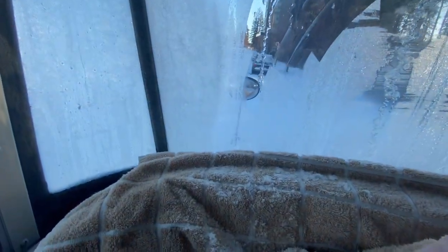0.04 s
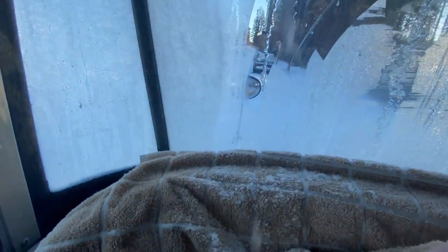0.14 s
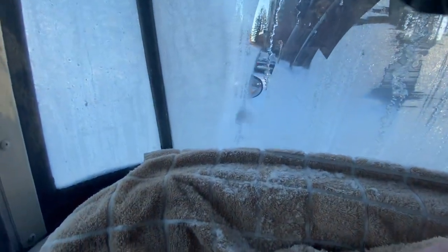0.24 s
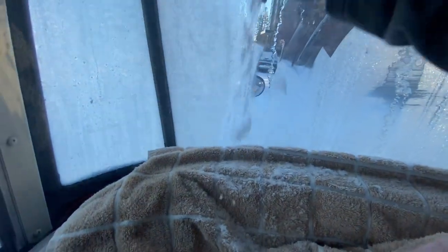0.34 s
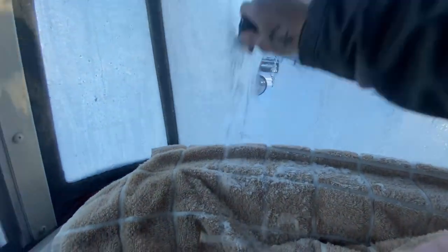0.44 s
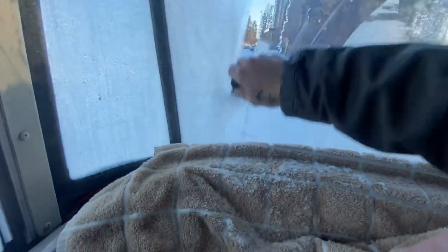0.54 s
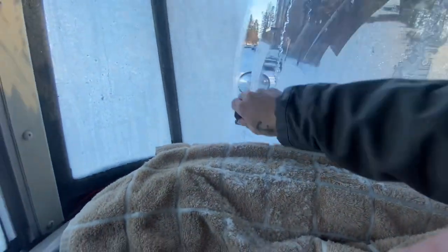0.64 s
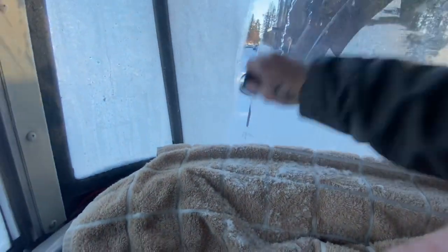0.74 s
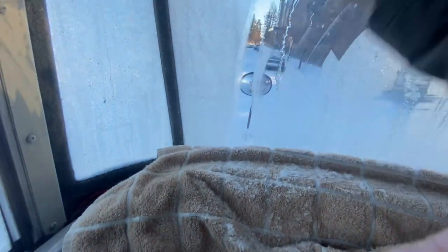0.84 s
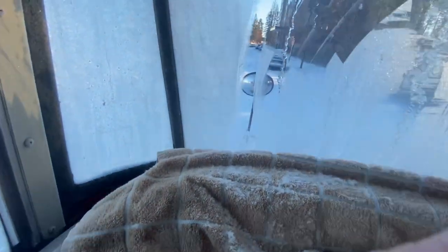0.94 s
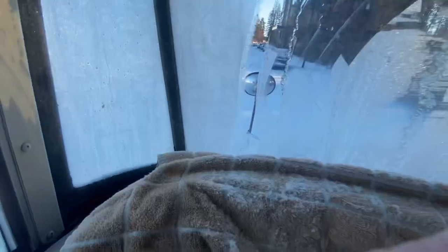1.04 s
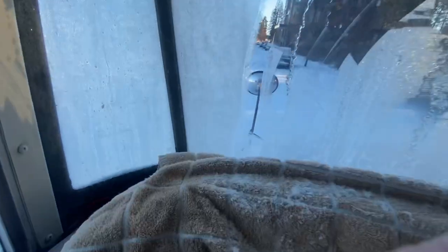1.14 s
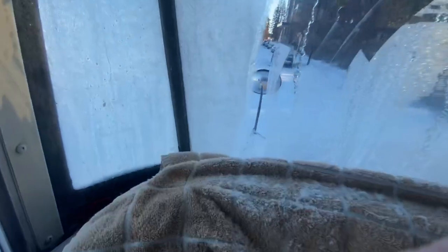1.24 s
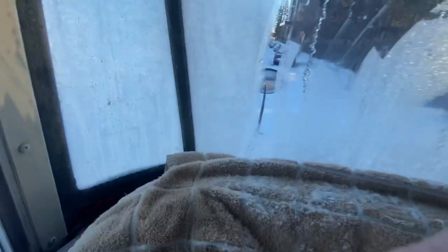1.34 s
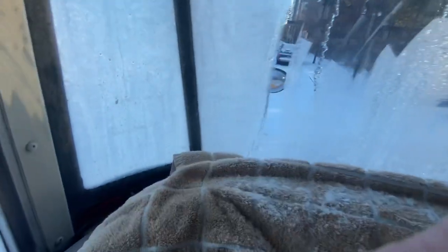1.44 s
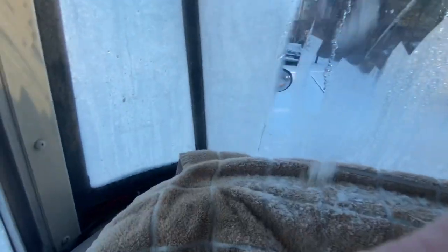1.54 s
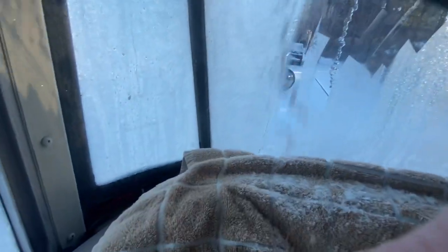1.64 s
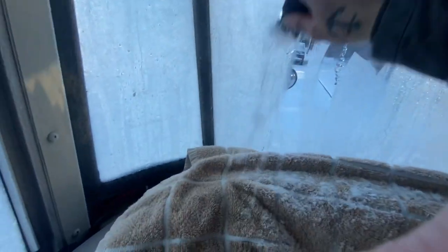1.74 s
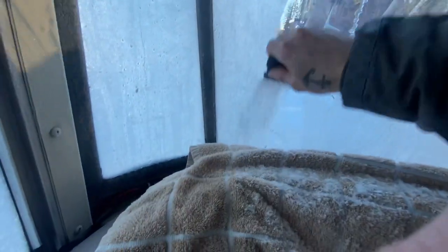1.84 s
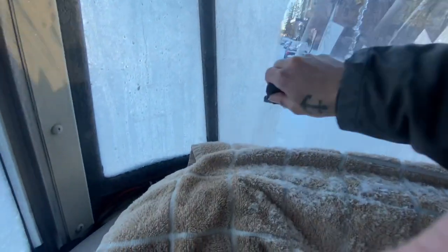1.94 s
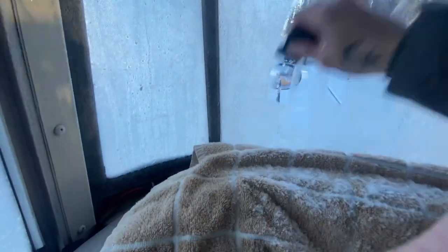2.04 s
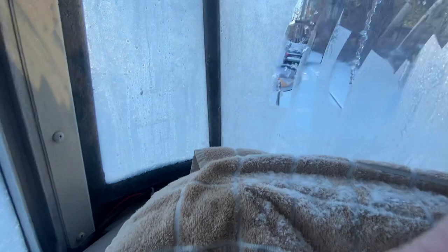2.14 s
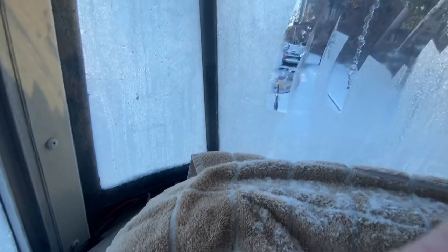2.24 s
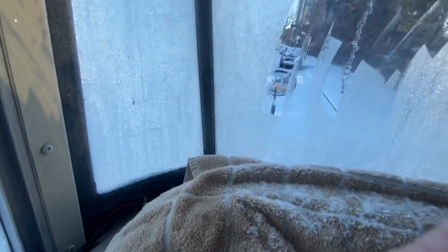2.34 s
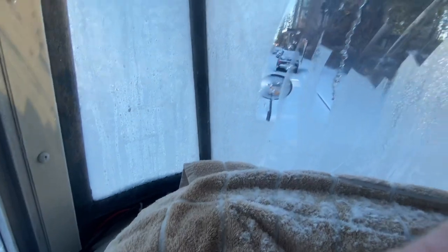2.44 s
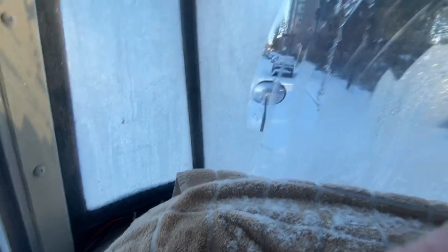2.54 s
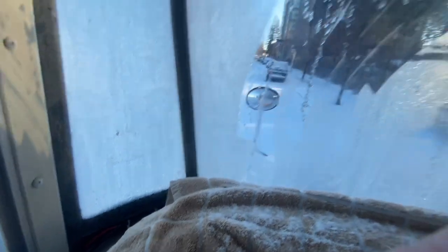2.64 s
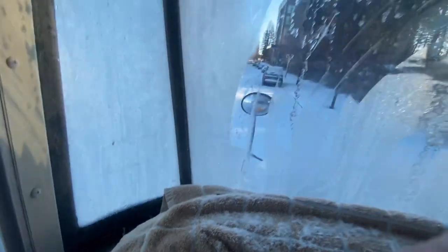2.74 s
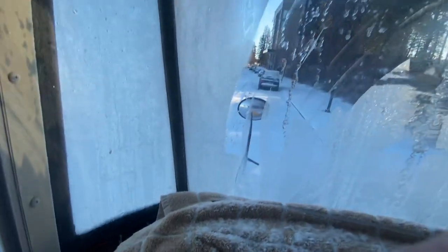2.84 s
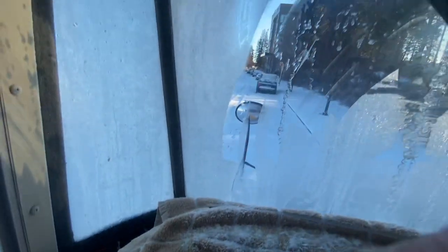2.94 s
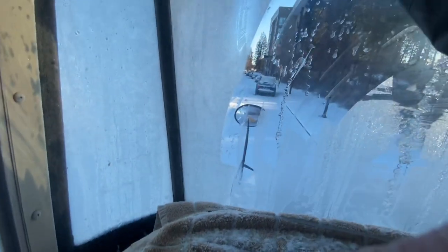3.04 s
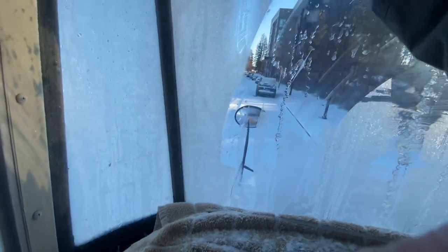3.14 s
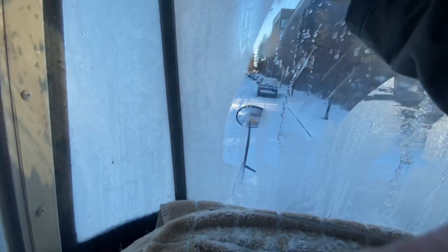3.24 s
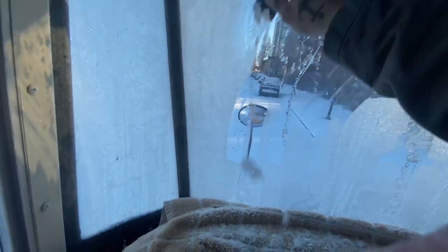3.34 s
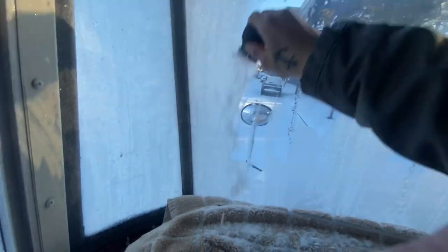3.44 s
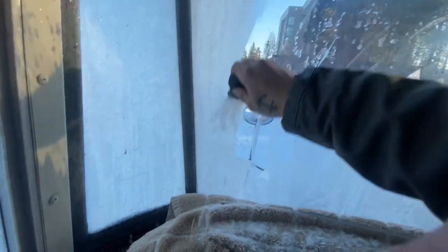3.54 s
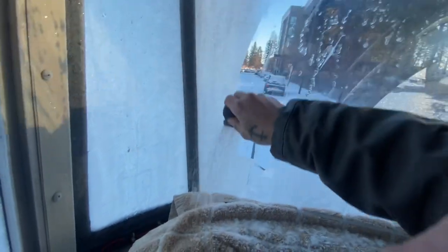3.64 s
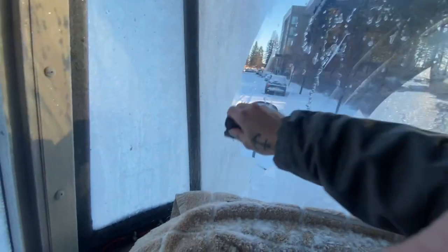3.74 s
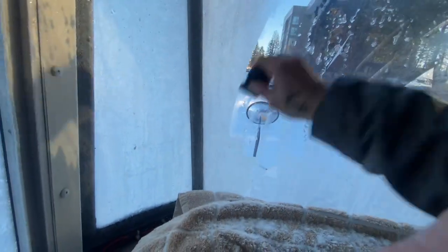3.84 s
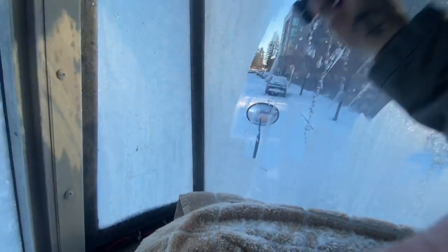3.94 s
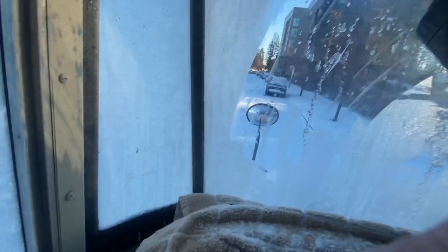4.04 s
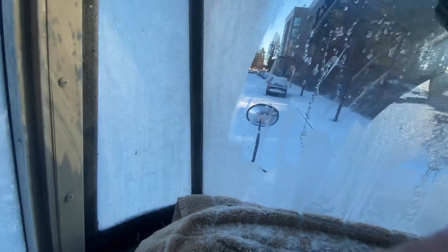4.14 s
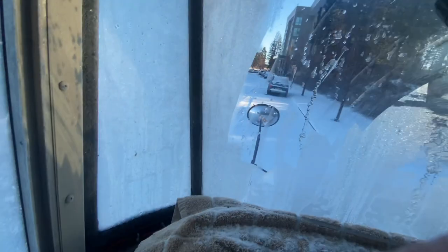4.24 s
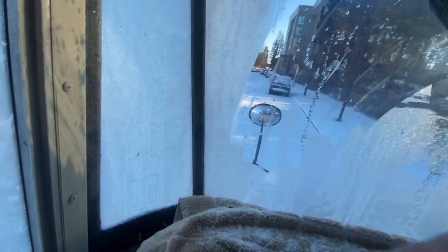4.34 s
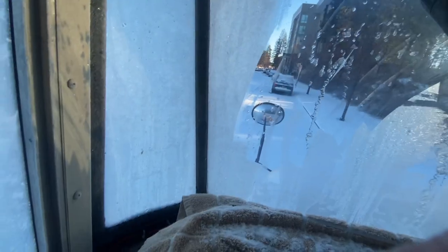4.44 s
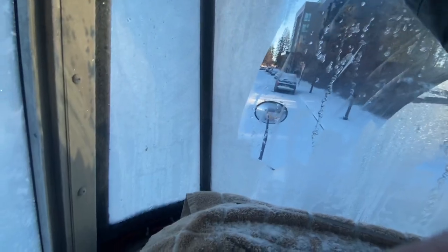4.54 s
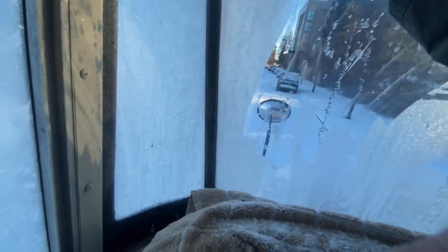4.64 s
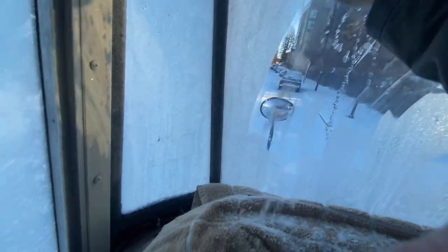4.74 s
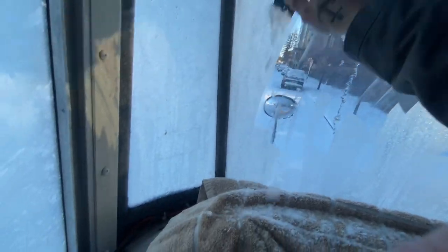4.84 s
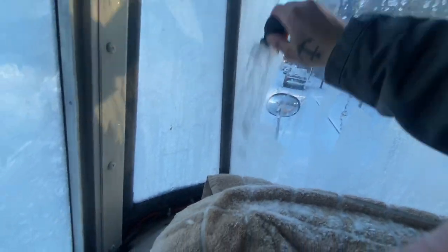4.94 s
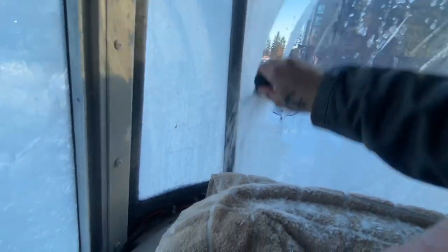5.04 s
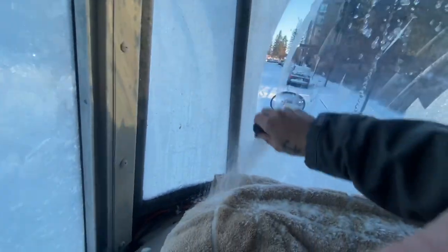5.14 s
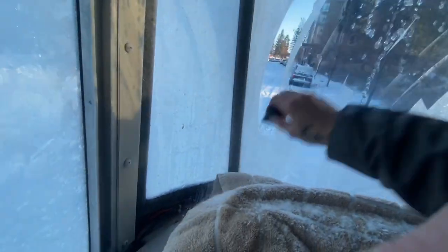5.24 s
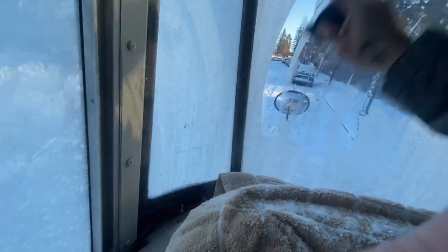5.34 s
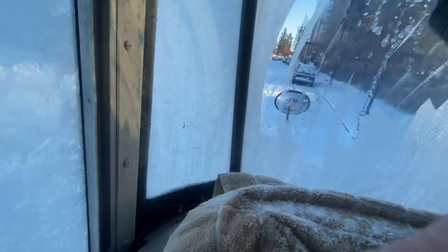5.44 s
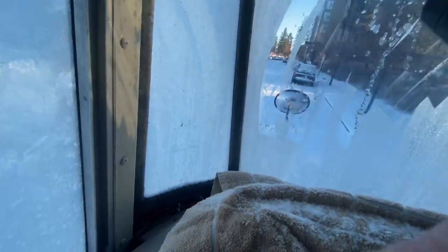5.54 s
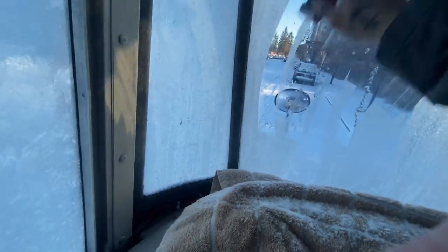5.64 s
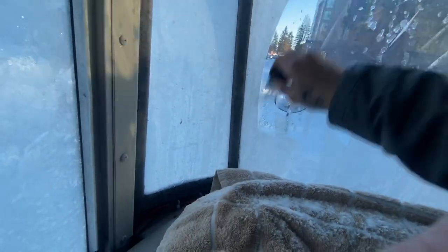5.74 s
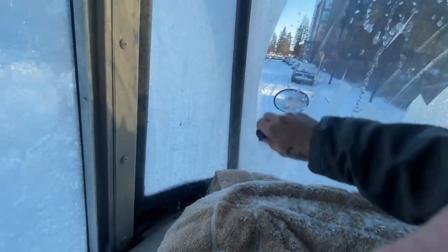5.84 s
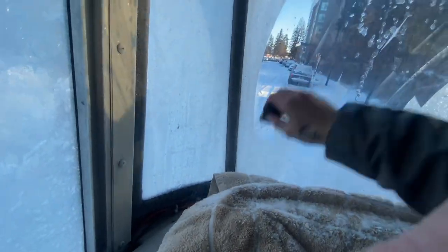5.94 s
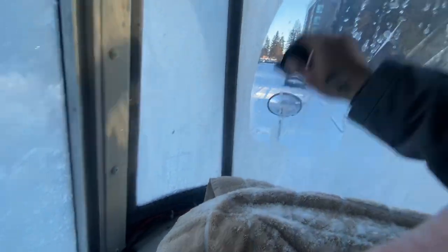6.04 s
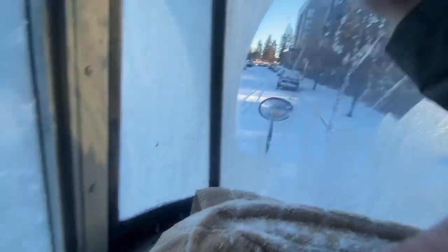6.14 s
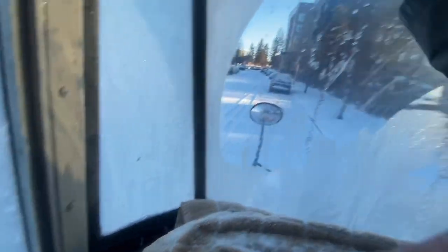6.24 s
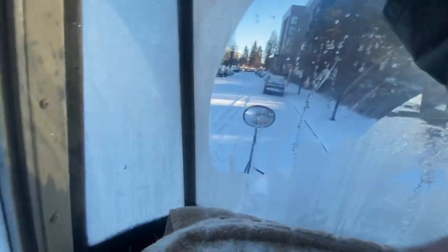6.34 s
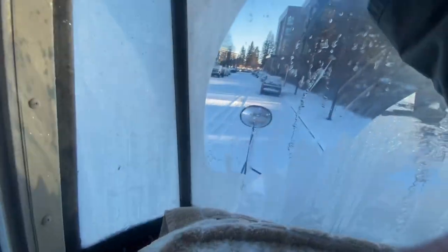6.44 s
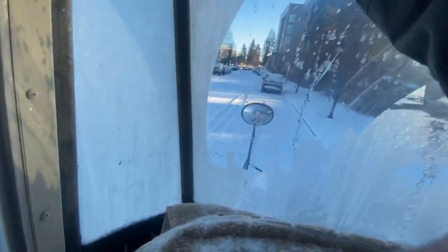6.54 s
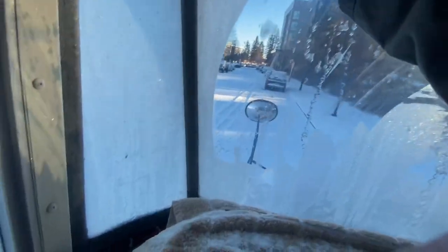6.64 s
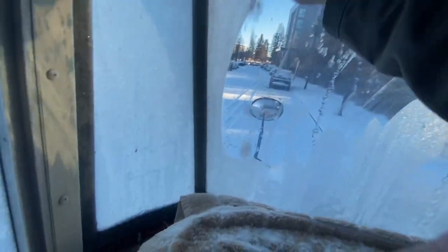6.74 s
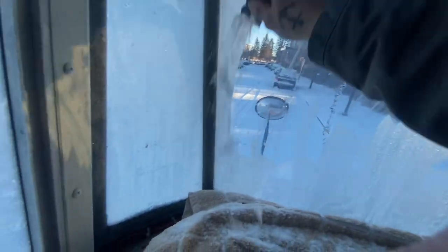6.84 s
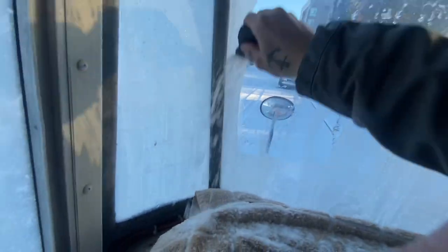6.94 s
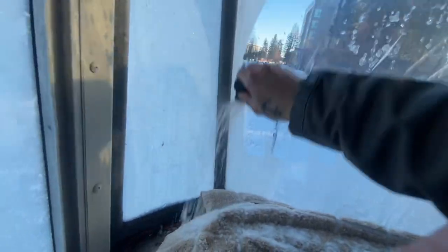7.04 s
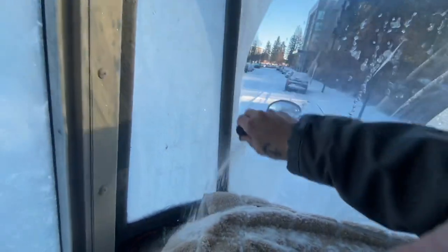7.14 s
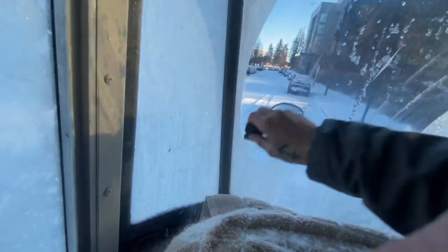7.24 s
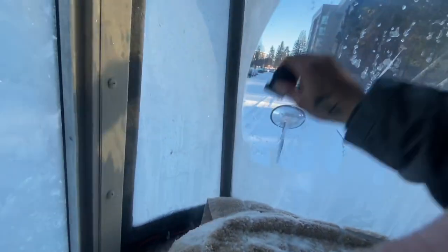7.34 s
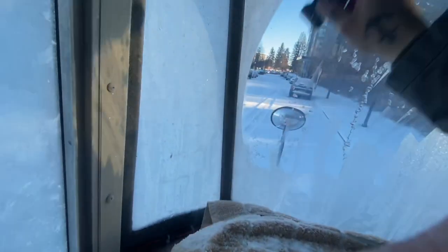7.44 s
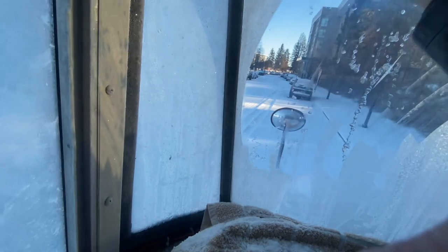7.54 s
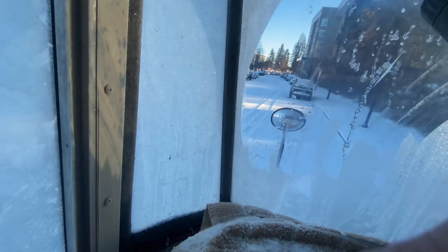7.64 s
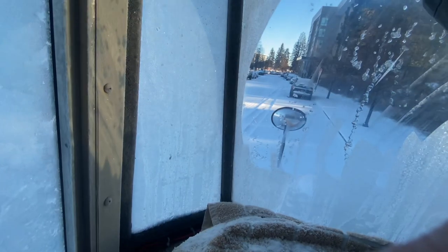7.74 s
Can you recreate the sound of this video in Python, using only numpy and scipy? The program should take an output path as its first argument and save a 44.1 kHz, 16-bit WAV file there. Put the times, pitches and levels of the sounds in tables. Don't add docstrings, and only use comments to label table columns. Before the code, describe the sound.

Very close stereo sound of a hard plastic scraper shaving frost from a window in a small, damped vehicle cabin. Five two-part strokes, a heavier gritty push followed by a lighter, hissier drag, come with pauses of about a second. Between them the edge ticks on glass, ice crumbs patter and shavings rustle softly. Low pane and door thumps sit beneath the pressed strokes, over faint street rumble.

```python
import sys
import numpy as np
from scipy import signal
from scipy.fft import rfft, irfft, next_fast_len
from scipy.io import wavfile
from scipy.ndimage import uniform_filter1d, map_coordinates

SR = 44100
rng = np.random.default_rng(int(sys.argv[2]) if len(sys.argv) > 2 else 0)


def gain_from_decibels(decibels):
    exponent = np.asarray(decibels, float) / 20
    return 10 ** exponent


def generate_wav(sig):
    pcm = np.round(np.clip(np.atleast_2d(sig).T, -1, 1) * 32767).astype(np.int16)
    wavfile.write(sys.argv[1], SR, pcm)


N = 343098

# t/s, blade speed/dB, pressure/dB
PUSHES = [
    [(0.0, -36.5, -7), (0.05, -47.5, -11), (0.074, -37, -25), (0.082, -39.5, -15), (0.208, -32.5, -18),
     (0.28, -40.5, -14), (0.3, -35.5, -22)],
    [(1.19, -40.5, -9.5), (1.202, -41.5, 5.5), (1.288, -43, -9), (1.332, -32.5, -20.5), (1.392, -36.5, -11),
     (1.432, -29, -11), (1.598, -41, -16), (1.655, -41, -21)],
    [(2.94, -58.5, 4.5), (2.978, -44.5, -1.5), (3.002, -43, 1.5), (3.06, -46.5, -2), (3.086, -37.5, -3),
     (3.258, -34.5, -7), (3.338, -43, -16.5), (3.39, -49, -14)],
    [(4.36, -54, 4.5), (4.392, -49, 6.5), (4.428, -41, 1), (4.504, -34.5, 3.5), (4.52, -39, -8.5),
     (4.534, -40, -2.5), (4.6, -38, -10.5), (4.685, -44.5, -23.5)],
    [(6.4, -46.5, 0), (6.42, -42.5, -1.5), (6.486, -42.5, -2.5), (6.492, -41, -11), (6.574, -39.5, -15),
     (6.612, -36.5, -6), (6.754, -37, -19.5), (6.8, -36.5, -11.5)],
]
# t/s, blade speed/dB, pressure/dB
PULLS = [
    [(0.31, -36.5, -16), (0.392, -39.5, -21), (0.474, -36, -20.5), (0.57, -37.5, -19), (0.642, -45, -15),
     (0.648, -48, -22), (0.658, -45, -6), (0.67, -53, -14)],
    [(1.67, -41, -25), (1.706, -33.5, -11), (1.734, -30, -11.5), (1.826, -34, -17), (1.86, -31, -18.5),
     (1.944, -35, -15), (1.952, -37.5, -20), (1.96, -63, -20)],
    [(3.405, -45, -18), (3.411, -47, -7), (3.445, -36.5, -24.5), (3.537, -36, -11), (3.561, -34, -21),
     (3.577, -35, -11), (3.719, -37.5, -20), (3.74, -49, -18)],
    [(4.7, -42.5, -23), (4.78, -32.5, -22.5), (4.88, -32.5, -13.5), (4.9, -27.5, -18), (4.956, -37, -15),
     (5.004, -31.5, -19.5), (5.174, -37, -15.5), (5.205, -66, -5)],
    [(6.81, -34.5, -22), (6.832, -37, -14), (6.936, -38, -18.5), (7.06, -33.5, -13.5), (7.068, -29, -16.5),
     (7.092, -35, -16.5), (7.12, -35, -17), (7.135, -66, -17)],
]
# t/s, blade speed/dB, pressure/dB
FLICKS = [
    [(1.095, -43, 0), (1.105, -43, 5.5), (1.135, -55, -3), (1.16, -59, 1)],
    [(5.61, -54.5, -3.5), (5.664, -42, -17.5), (5.702, -44.5, -10), (5.72, -46, -12.5), (5.78, -56, -4.5)],
    [(5.815, -45, -17), (5.839, -46.5, -19), (5.853, -31, -11.5), (5.91, -67, 2)],
]
# t/s, fade for 20 dB/s, level/dB, weight/dB
RUSTLES = [(.69, 0.53, -66.5, -12), (.96, 0.9, -67, 4.5), (1.975, 0.12, -64.5, -5), (2.095, 0.06, -75, 20),
           (2.276, 1.5, -82.5, 16), (2.34, 0.37, -68, -3), (2.425, 0.29, -66, 13), (2.6, 3, -82.5, -3),
           (2.885, 0.35, -61.5, 6), (3.75, 0.23, -67, -11), (3.9, 4, -82.5, 2.5), (4.27, 1.3, -62.5, 2.5),
           (5.168, 0.0078, -32, -17), (5.21, 0.8, -65, 2), (5.49, 0.39, -57.5, 2), (5.92, 0.9, -73.5, 2),
           (6.2, 0.5, -73, 2), (6.314, 0.77, -64.5, 3.5), (7.145, 0.38, -65.5, -1), (7.37, 0.22, -67.5, -2),
           (7.575, .15, -75, 1), (7.62, 0.07, -74.5, 5)]
# t/s, length/s, extra rasp/dB
SNAGS = [(0.658, .02, 3), (1.088, 0.063, 5), (1.438, 0.044, 1.5), (1.74, 0.051, 5), (3.224, 0.03, 1.5),
         (3.565, 0.017, 1), (3.73, 0.022, 8.5), (4.601, .04, 3.5), (4.79, 0.046, 4), (4.891, 0.021, 5),
         (5.16, 0.017, 8.5), (5.848, 0.012, 9), (7.06, 0.036, 6), (7.12, 0.016, 3.5)]
# t/s, length/s, f/Hz, boost/dB
VOICES = [(.15, .15, 5400, 2.5), (.5, .15, 8700, 2.5), (0.449, .15, 1100, -5.5), (.99, .04, 2100, 13),
          (.935, .015, 2250, 12), (1.43, .08, 11000, 5.5), (1.449, .15, 650, -5), (1.47, .12, 1500, 8),
          (1.1, .1, 390, -6), (3.03, .07, 3400, -7), (5.68, .04, 3200, -8), (1.77, .06, 2300, 6),
          (1.78, .06, 750, 4), (1.8, .12, 8600, 3), (3.18, .13, 5400, 6), (3.15, .15, 3900, -4),
          (3.17, .12, 6600, -3), (3.05, .1, 1250, 3), (3.1, .15, 750, -4), (4.43, .08, 800, -5),
          (4.43, .06, 1800, -4), (3.55, .12, 750, 5), (3.551, .1, 5400, 2.5), (3.6, .15, 1300, -4),
          (4.48, .06, 1250, 3.5), (4.901, .2, 560, -8), (4.949, .2, 2900, 2.5), (4.95, .15, 11000, 3),
          (5.52, .04, 1800, 6.5), (5.699, .06, 8200, 5), (5.7, .06, 1000, 6.5), (5.855, .012, 3600, 6),
          (5.86, .02, 600, 6), (5.16, .03, 3800, 6), (7.03, .1, 850, 6), (.3, .12, 6400, -3),
          (6.55, .15, 5400, 3.5), (6.5, .1, 1400, 4), (6.55, .15, 750, -5), (7.05, .07, 1700, 4),
          (6.95, .12, 9800, -3.5), (7.409, .025, 2300, 21), (7.48, .035, 2250, 20), (7.375, .015, 2700, 12),
          (7.37, .06, 4300, 7)]
# t/s, level/dB
LEAN = [(0.0, -50), (0.56, -44.5), (0.6, -43), (0.93, -61), (1.25, -41.5), (1.71, -59.5), (1.82, -47.5),
        (2.66, -65), (3.23, -48), (3.51, -58), (3.66, -43.5), (4.05, -68.5), (4.1, -56), (4.29, -67),
        (4.42, -41), (4.96, -59.5), (5.85, -56), (7.55, -57)]
# f/Hz, density/dB per Hz
FIZZ = [(3000, -32.5), (4800, -13), (5800, -2), (6900, -6), (8200, -2), (9400, -2.5), (11400, -8),
        (13000, -12), (16000, -24.5)]
# f/Hz, density/dB per Hz
RASP = [(800, -29.5), (1300, -3.5), (1800, 4.5), (2500, 2), (3500, 1), (4500, -2), (6500, -17.5)]
# f/Hz, density/dB per Hz
SCRUB = [(250, -38.5), (450, -4.5), (720, 1.5), (1000, -2), (1300, -1), (2200, -31)]
# f/Hz, density/dB per Hz
CRUNCH = [(400, -27), (1500, 4.5), (4000, 1.5), (8000, -0.5), (12000, -9), (16000, -2.5)]
# f/Hz, width/Hz, level/dB
PANE = [(154.2, 28, -2), (179.6, 27.4, -0.5), (219.2, 16, -1.5), (244.8, 62, -6.5), (299.5, 21, -2.5),
        (326.3, 30, -1.5), (380, 130, -12.5)]
# f/Hz, width/Hz, level/dB
DOOR = [(55, 17.3, -3.5), (69.9, 6.7, -9), (85.3, 16.2, -1.5), (120.7, 20, -11.5)]
# t/s, peak/dB, ring f/Hz, ring/dB, thud/dB
KNOCKS = [(0.698, -28.5, 1960, -1.5, -27), (1, -31.5, 1600, -4, -21), (1.0913, -28.5, 1410, -10, -17),
          (1.193, -34, 990, -3, -5.5), (1.9758, -23, 4050, -4, -34), (2.4193, -39.5, 377, -3, -13),
          (2.87, -29.5, 1230, -14, 1.5), (3.7443, -27.5, 4100, 7, -24), (4.2618, -30, 1740, -5, -26),
          (4.355, -33, 1170, -5, 10.5), (5.246, -32, 2380, -3, -19), (5.4519, -30.5, 2090, -1.5, -19),
          (5.4771, -10.5, 1776, 0.5, -10), (5.8141, -33, 1400, -10, -11), (6.304, -25, 1810, 1, -5),
          (6.4, -34, 1300, -6, 12), (7.1198, -25, 1670, -12, -33), (7.1583, -32.5, 3610, -2, -17),
          (1.222, -46, 266, 4, 12), (4.475, -38.5, 220, 8.5, 16), (6.6, -44, 319, 3, 5)]
# t/s, peak/dB, ring f/Hz, ring/dB
CRUMBS = [(0.926, -48, 2230, 9), (0.9707, -42, 2140, 9), (2.158, -46, 2060, 5), (2.272, -52, 1360, 7),
          (2.323, -53, 1410, -2), (3.923, -64, 1670, 1), (5.298, -45, 3340, -23), (5.4295, -47, 2000, -7),
          (5.6, -45, 1680, -4), (6.1768, -53, 2350, -18), (6.2074, -37, 2050, -5), (6.2675, -43, 4200, -1),
          (6.3794, -39, 1890, -12), (6.345, -44.5, 2600, -8), (5.197, -41, 2200, -9),
          (7.249, -52, 1730, -1), (7.3255, -56, 4400, 3), (7.3602, -50, 4300, 0), (7.3944, -49, 4000, 3),
          (7.423, -53, 5400, 0), (7.37, -64, 2750, 9), (7.395, -62, 2300, 12), (7.4069, -54, 2150, 11),
          (7.413, -62, 2500, 13), (7.424, -64, 2200, 12), (7.457, -64, 2350, 11), (7.466, -63, 2150, 12),
          (7.483, -65, 2250, 12), (7.493, -65, 2400, 12), (7.501, -68, 2150, 12), (7.5705, -52, 3100, -3),
          (7.622, -55, 6100, 0), (5.4725, -39, 2000, 0), (7.588, -62.5, 371, 15), (7.611, -49, 1920, -6),
          (5.311, -59, 377, 10), (5.521, -46.5, 3700, -10), (5.548, -37.5, 3500, -10)]
# f/Hz, left lead/rad
LEAD = [(0, 0), (340, -0.28), (520, -1.64), (1120, -6), (4390, -7.0), (6890, -0.5), (7920, -3), (8270, -4),
        (9130, -9), (10400, -11.5), (11900, -12), (12500, -15), (14000, -15), (14600, -21), (16400, -20.5)]
# f/Hz, rms/rad
WANDER = [(100, 0.39), (300, 0.59), (800, 1.82), (6000, 1.4), (8500, 0.4), (11000, .25)]
# f/Hz, left-right/dB
TILT = [(100, -0.5), (400, -3.5), (800, 5), (1500, 0), (5800, 5.5), (8300, -5), (12000, -1.5)]
# t/s, left-right/dB
HAND = [(0.0, -0.5), (1.62, 0.5), (1.9, -3.5), (1.97, 0.5), (2.23, 1), (2.27, 4.5), (2.34, -2.0),
        (3.14, 2.5), (3.16, 0.0), (4.33, -1.5), (4.4, 1.0), (5.11, -1.0), (5.2, 1.5), (5.59, 1.0),
        (5.68, -2.0), (6.46, 2.0), (6.87, 0), (7.78, 1.5)]
# f/Hz, t60/s
CABIN = [(100, 0.039), (1000, 0.15), (10000, 0.065)]
# f/Hz, level/dB
WET = [(100, -30.5), (500, -7), (3000, 1), (7000, -1.5), (11000, -2.5)]
# f/Hz, density/dB per Hz
QUIET = [(18, -33.5), (30, 2.5), (92, -1), (247, -33.5), (288, -31.5), (629, -26.5), (735, -45.5),
         (11600, -48), (12500, -23.5), (15000, -39)]
# f/Hz, rms/dB
WHINE = [(12845, -86)]

LAND_DB_PER_S, LIFT_DB_PER_S = 2502, 1501
RUSTLE_RISE_S = 0.033
VOICE_OCTAVES = 0.16
MID_SPEED_DB, MID_PRESS_DB = -36.5, -10.5
RASP_DB, RASP_PER_PRESS = -9, 0.33
BOOM_PER_SPEED, BOOM_PER_PRESS = 0.21, 0.3
RING_CYCLES, OVERTONE = 41, 2.3
CRUMB_THUD_DB, CRUNCH_T60_S, SHORTER_PER_DB = -18, 0.042, 0.44


def unit(x):
    return x / np.sqrt(np.mean(x ** 2) + 1e-20)


def along(points, hz):
    f, v = np.transpose(points)
    return np.interp(np.log(hz + 1), np.log(f + 1), v)


def at_time(points):
    return np.interp(np.arange(N) / SR, *np.transpose(points))


def wobble(rate_hz):
    knots = rng.standard_normal(int(N * rate_hz / SR) + 4)
    return map_coordinates(knots, [np.arange(N) * rate_hz / SR], order=2, prefilter=False) * 1.15


def filtered(x, response):
    m = next_fast_len(x.shape[-1] + 8192)
    return irfft(rfft(x, m) * response(np.fft.rfftfreq(m, 1 / SR)), m)[..., :x.shape[-1]]


def coloured(x, colour):
    return unit(filtered(x, lambda hz: gain_from_decibels(along(colour, hz))))


def patches(shape, bins, frames):
    field = rng.standard_normal(shape)
    for _ in range(2):
        field = uniform_filter1d(field, int(bins), 0)
        field = uniform_filter1d(field, int(frames), 1)
    return unit(field)


def scraping():
    fizz_db, press_db = contact()
    rasp_db = fizz_db + RASP_DB + RASP_PER_PRESS * (press_db - MID_PRESS_DB)
    t = np.arange(N) / SR
    snag_db = sum(db * np.exp(-((t - s) / length) ** 2) for s, length, db in SNAGS)
    rasp_db = rasp_db + snag_db
    fizz_db = fizz_db + 0.2 * snag_db
    scrub_db = fizz_db + press_db
    drum_db = at_time(LEAN) + 5
    drum_db += BOOM_PER_SPEED * (np.maximum(fizz_db, -75) - MID_SPEED_DB)
    drum_db += BOOM_PER_PRESS * (np.minimum(press_db, 4) - MID_PRESS_DB)
    frost = breaking(grain_db=2.5, clump_db=1.2, patchy_db=1.1, streak_db=3.6)
    judder = wobble(45)
    fizz = gain_from_decibels(fizz_db + 0.65 + 0.24 * judder) * coloured(frost, FIZZ)
    rasp = gain_from_decibels(rasp_db + 0.55 + 0.52 * judder) * coloured(frost, RASP)
    scrub = gain_from_decibels(scrub_db - 0.5 + 3.95 * judder) * coloured(frost, SCRUB)
    boom = gain_from_decibels(drum_db + 29.0 + 1.3 * wobble(18)) * rng.standard_normal(N)
    press = gain_from_decibels(0.48 * drum_db + 0.58 * scrub_db + 26 + 1.96 * judder) * rng.standard_normal(N)
    return fizz + rasp + scrub + filtered(boom, lambda hz: modes(hz, DOOR)) + filtered(press, pane)


def contact():
    t = np.arange(0, N, 32) / SR
    moves = []
    for s, speed_db, press_db in map(np.transpose, PUSHES + PULLS + FLICKS):
        away_db = LAND_DB_PER_S * np.maximum(s[0] - t, 0) + LIFT_DB_PER_S * np.maximum(t - s[-1], 0)
        moves.append((np.interp(t, s, speed_db) - away_db, np.interp(t, s, press_db)))
    for s, fade_s, db, weight_db in RUSTLES:
        away = np.maximum((s - t) / RUSTLE_RISE_S, (t - s) / fade_s)
        moves.append((db - 20 * away, weight_db + 0 * t))
    speed_db, press_db = np.transpose(moves, (1, 0, 2))
    power = gain_from_decibels(2 * speed_db) + 1e-14
    total = power.sum(0)
    mean_press_db = (power * press_db).sum(0) / total
    return [np.interp(np.arange(N) / SR, t, v) for v in (10 * np.log10(total), mean_press_db)]


def breaking(grain_db, clump_db, patchy_db, streak_db):
    snaps = rng.standard_normal(N) * gain_from_decibels(grain_db * wobble(1500) + clump_db * wobble(110))
    z = signal.stft(snaps, nperseg=2048, noverlap=1536)[2]
    hz = np.fft.rfftfreq(2048, 1 / SR)[:, None] + 1
    t = np.arange(z.shape[1]) * 512 / SR
    voice_db = 0
    for s, length, centre_hz, db in VOICES:
        octaves = np.log2(hz / centre_hz)
        voice_db = voice_db + db * np.exp(-((t - s) / length) ** 2 - (octaves / VOICE_OCTAVES) ** 2)
    z *= gain_from_decibels(voice_db + patchy_db * patches(z.shape, 24, 4) + streak_db * patches(z.shape, 3.2, 7))
    return signal.istft(z, nperseg=2048, noverlap=1536)[1][:N]


def modes(hz, table):
    total = 0
    for k, (centre_hz, width_hz, db) in enumerate(table):
        damping = 1j * hz * width_hz
        total = total + (-1) ** k * gain_from_decibels(db) * damping / (centre_hz ** 2 - hz * hz + damping)
    return total


def pane(hz):
    return modes(hz, PANE)


def ticks():
    edge, thuds = np.zeros(N + SR), np.zeros(N)
    t = np.arange(SR // 10) / SR
    touches = KNOCKS + [(*crumb, CRUMB_THUD_DB) for crumb in CRUMBS]
    ices = coloured(rng.standard_normal((len(touches), len(t))), CRUNCH)
    for (s, db, hz, ring_db, thud_db), ice in zip(touches, ices):
        t60_s = CRUNCH_T60_S * gain_from_decibels(-SHORTER_PER_DB * max(db + 31.5, 0))
        ring = gain_from_decibels(ring_db - 60 * t * hz / RING_CYCLES) * np.sin(2 * np.pi * hz * t)
        ring += gain_from_decibels(ring_db - 16.0 - 60 * t / 0.019) * np.sin(2 * np.pi * OVERTONE * hz * t)
        crunch = (gain_from_decibels(-11.0 - 60 * t / t60_s) + gain_from_decibels(-2.0 - 60 * t / 0.012)) * ice
        onset = 1 - np.exp(-t / 0.0011)
        edge[round(s * SR):][:len(t)] += gain_from_decibels(db) * onset * (ring + crunch)
        thuds[round(s * SR)] = gain_from_decibels(db + thud_db + 32.5)
    return edge[:N] + filtered(thuds, lambda hz: pane(hz) + modes(hz, DOOR))


def ports(x):
    hz, t, z = signal.stft(x, SR, nperseg=512)
    lead_rad = along(LEAD, hz)[:, None] + along(WANDER, hz)[:, None] * patches(z.shape, 9, 50)
    balance_db = along(TILT, hz)[:, None] + 0.7 * np.interp(t, *np.transpose(HAND))
    half = np.exp(0.5j * lead_rad) * gain_from_decibels(balance_db / 2)
    return signal.istft(np.array([z * half, z / half]), SR, nperseg=512)[1][:, :N]


def cabin(x):
    hz, t, z = signal.stft(x, SR, nperseg=256)
    keep = gain_from_decibels(-120 * t[1] / along(CABIN, hz))
    linger = np.array([signal.lfilter([0, 1 - k], [1, -k], p) for k, p in zip(keep, np.abs(z) ** 2)])
    paths = signal.stft(rng.standard_normal((2, N)), SR, nperseg=256)[2]
    echo = gain_from_decibels(along(WET, hz))[:, None] * np.sqrt(linger) * paths / np.std(paths)
    return signal.istft(echo, SR, nperseg=256)[1][:, :N]


def stillness():
    hiss = gain_from_decibels(-60) * coloured(rng.standard_normal((2, N)), QUIET)
    (hz, db), = WHINE
    phase = 2 * np.pi * hz * np.arange(N) / SR + 2.5 * wobble(60)
    whine = gain_from_decibels(db + 4.0 + 2.5 * wobble(12)) * np.sin(phase)
    return hiss + whine * [[1.6], [-0.4]]


def scene():
    stroke, touch = scraping(), ticks()
    return ports(stroke + touch) + cabin(stroke + gain_from_decibels(-6.5) * touch) + stillness()


def roll_off(x):
    return signal.sosfilt(signal.butter(12, 16800, fs=SR, output="sos"), x)


def record(dry):
    dry = filtered(dry, lambda hz: (1j * hz / (1j * hz + 44)) ** 3)
    hz, _, z = signal.stft([dry[0] + dry[1], dry[0] - dry[1]], SR, nperseg=1024)
    hz = hz[:, None]
    treble = np.abs(z[0, 100:250]).mean(0)
    lows = np.abs(z[0, 7:35]).mean(0)
    loud_db = 20 * np.log10(uniform_filter1d(treble, size=5) + 1e-9)
    low_db = 20 * np.log10(uniform_filter1d(lows, size=9) + 1e-9)
    level_db = 20 * np.log10(treble + 1e-9)
    busy = np.clip((loud_db + 71) / 5, -3, 0.5)
    spare = np.clip((loud_db - low_db - 2) / 7, -1, 0.7)
    luck = [patches(z[0].shape, 9, 4) for _ in range(2)]
    specks = [patches(z[0].shape, 5, 5) for _ in range(2)]
    whine = (np.abs(hz - WHINE[0][0]) < 90) & (busy < 0)
    sudden = (np.diff(level_db, prepend=0) > 9) & (level_db > -76) & (hz < 16300)
    bands = uniform_filter1d(rng.standard_normal((z.shape[1] // 8 + 1, z.shape[2])), size=6)
    bands = unit(bands).repeat(8, axis=0)[:len(hz)]
    scraps = (hz > 13800) & (hz < 15850) & (bands + busy + spare > 1.25) | sudden
    thin = 1.55 + 0.7 * np.abs(np.log2(hz / 3400 + 1e-3))
    mid_band = hz < 12450 + 100 * busy + 40 * luck[0]
    z[0] *= (mid_band | scraps | whine) & (specks[0] < thin)
    gap = np.abs(hz - 11500) < 450 + 350 * luck[1]
    side_band = (hz < 13800 + 500 * busy + 300 * luck[1]) & ~gap
    z[1] *= (side_band | whine) & (specks[1] < thin - 0.5)
    mid, side = signal.istft(z, SR, nperseg=1024)[1][:, :N] / 2
    return roll_off(np.array([mid + side, mid - side]))


dry = scene()
out = record(dry)
generate_wav(out)
```